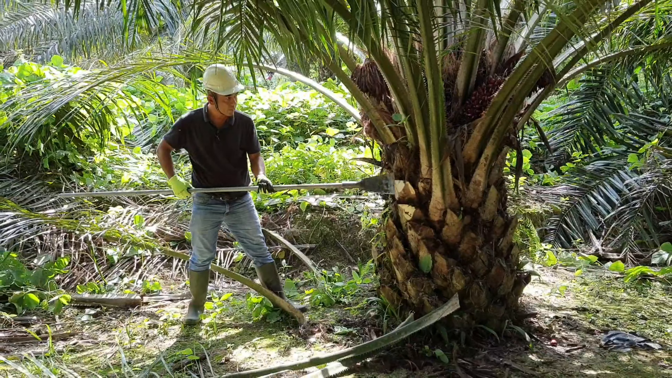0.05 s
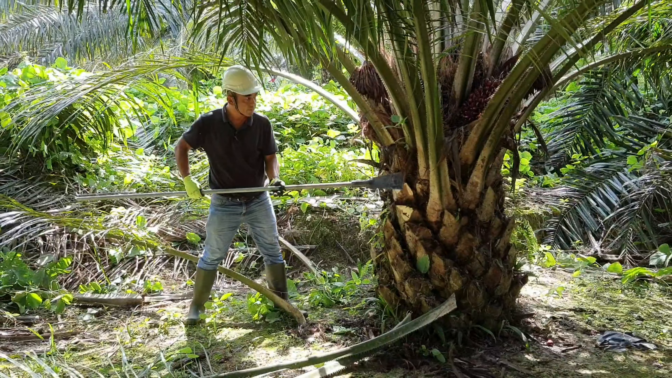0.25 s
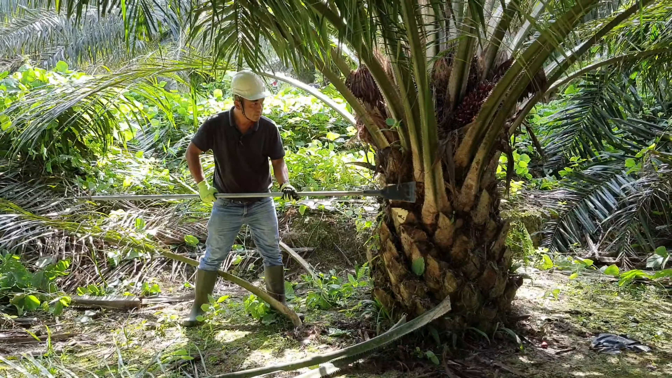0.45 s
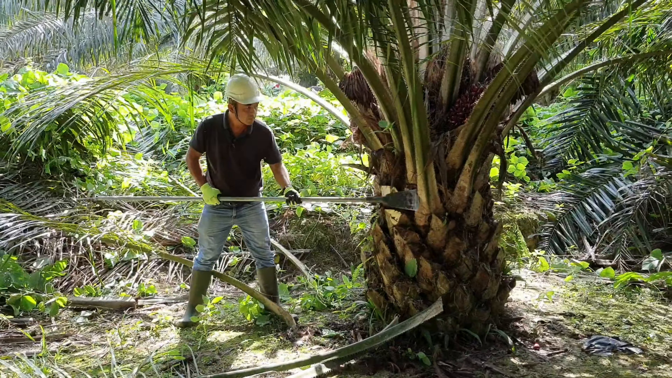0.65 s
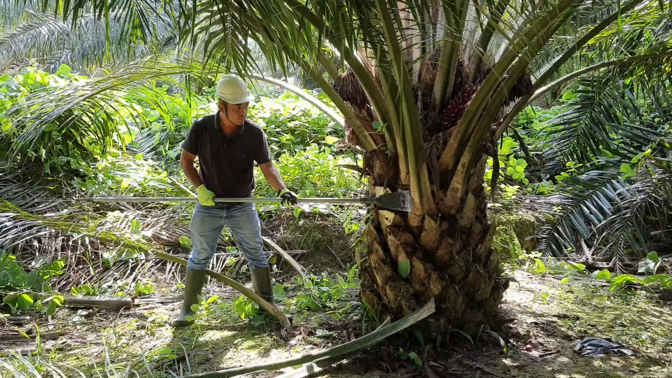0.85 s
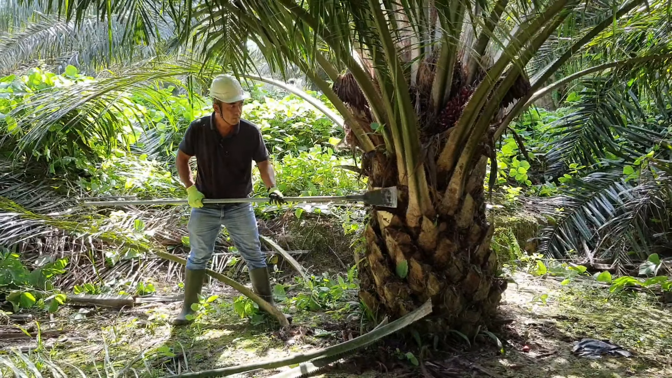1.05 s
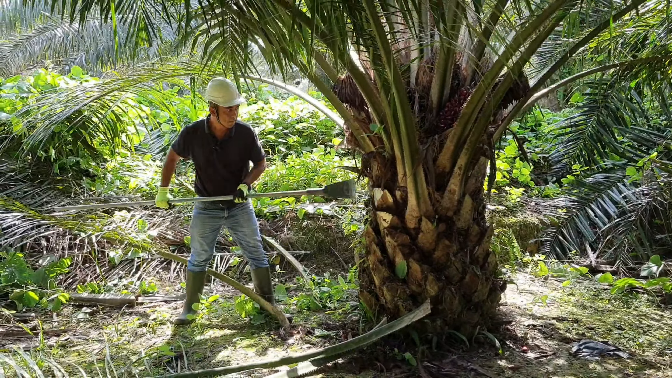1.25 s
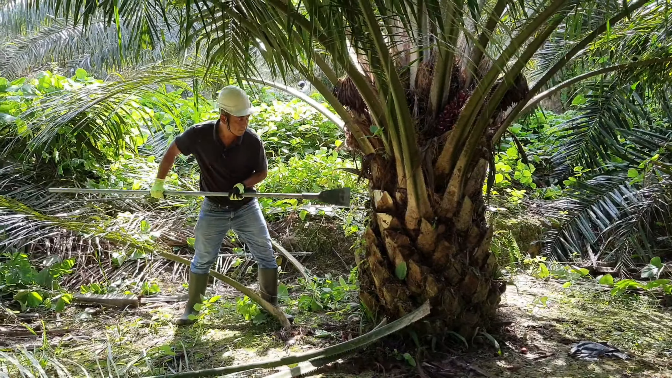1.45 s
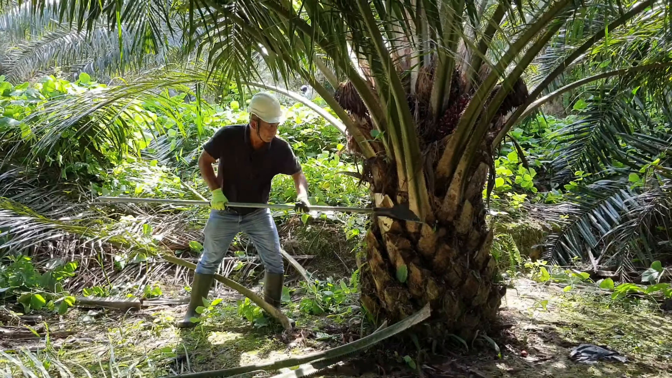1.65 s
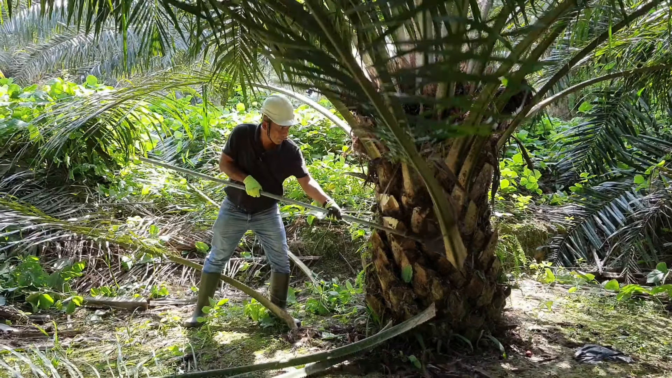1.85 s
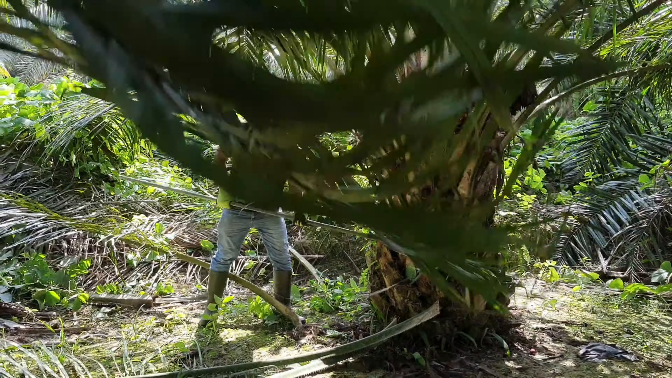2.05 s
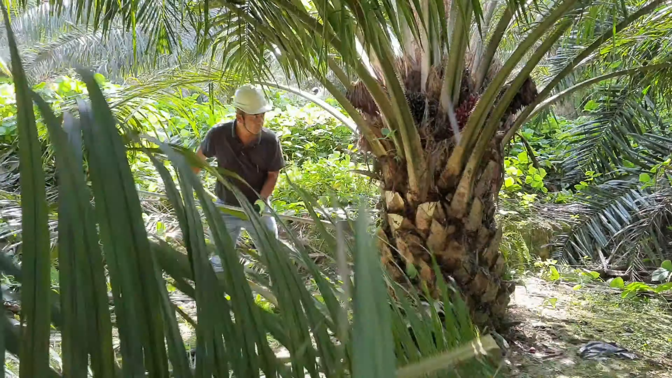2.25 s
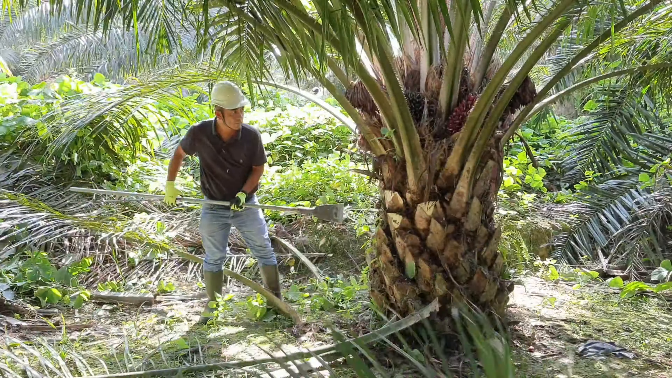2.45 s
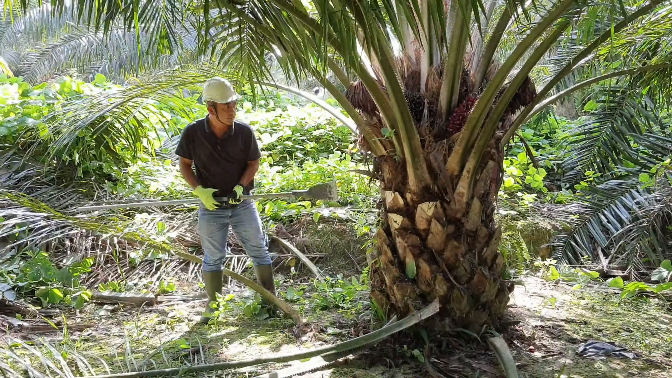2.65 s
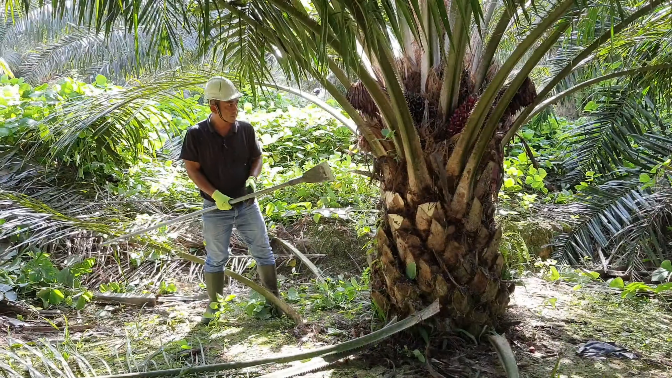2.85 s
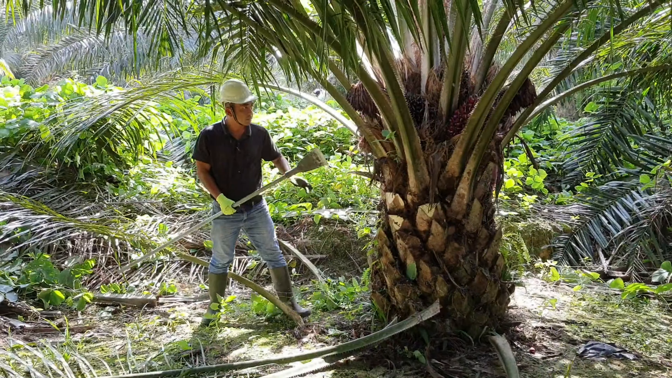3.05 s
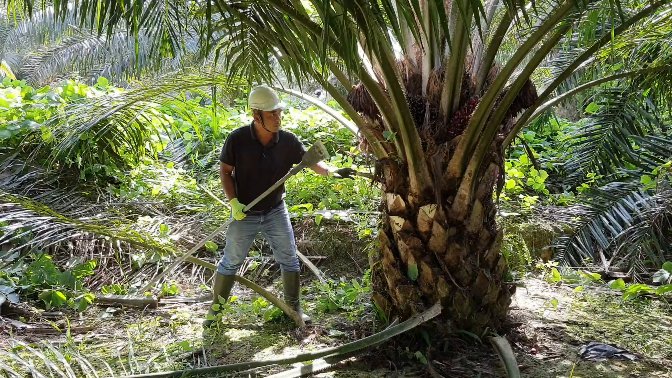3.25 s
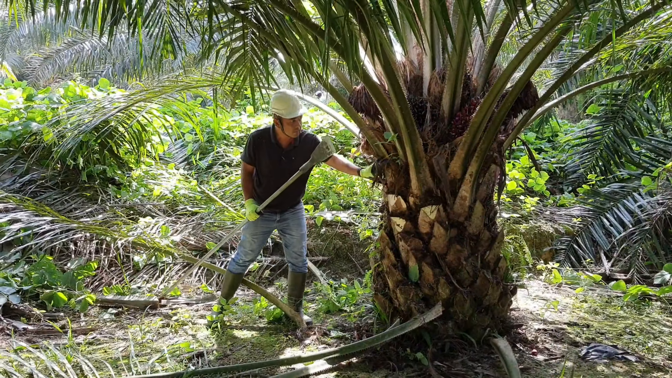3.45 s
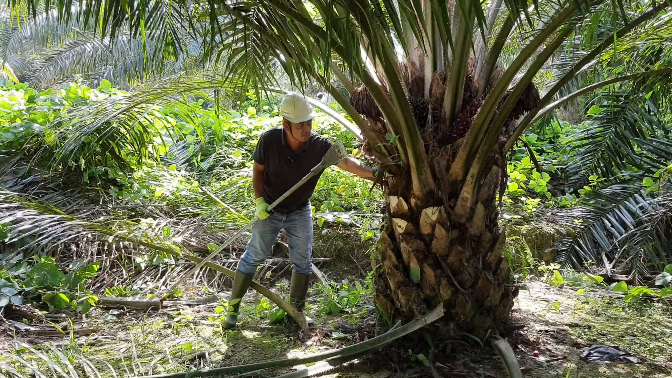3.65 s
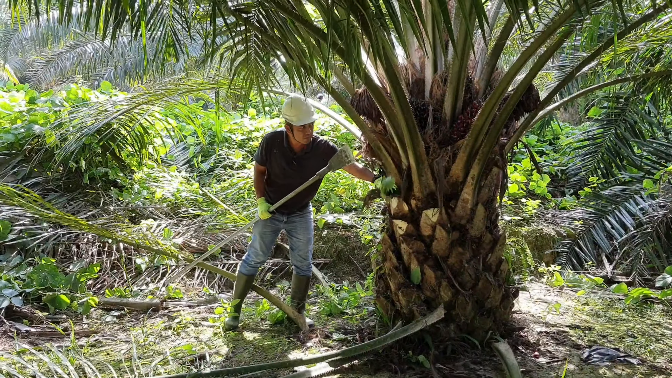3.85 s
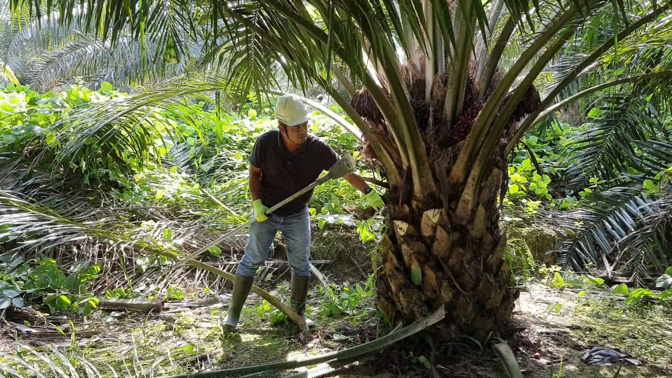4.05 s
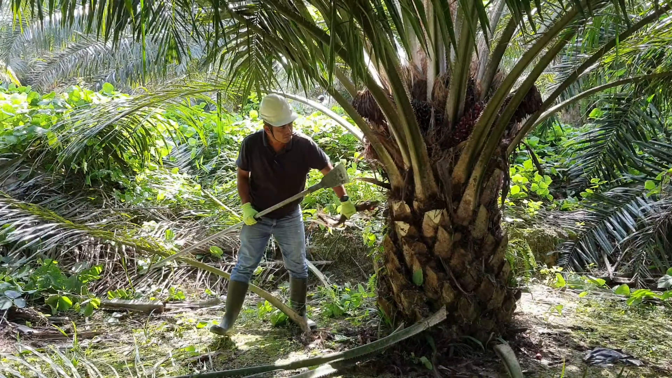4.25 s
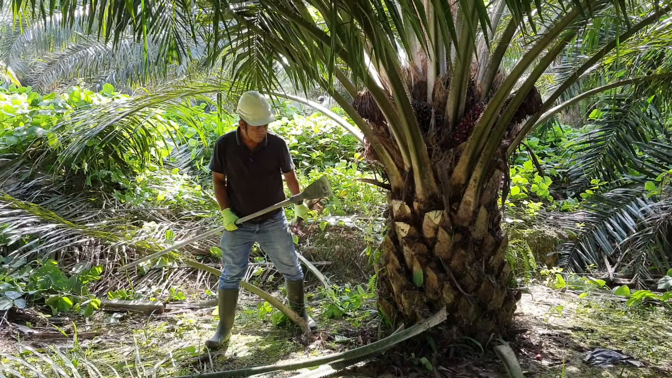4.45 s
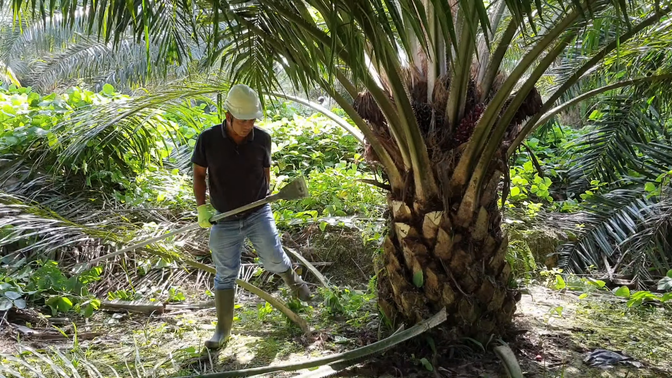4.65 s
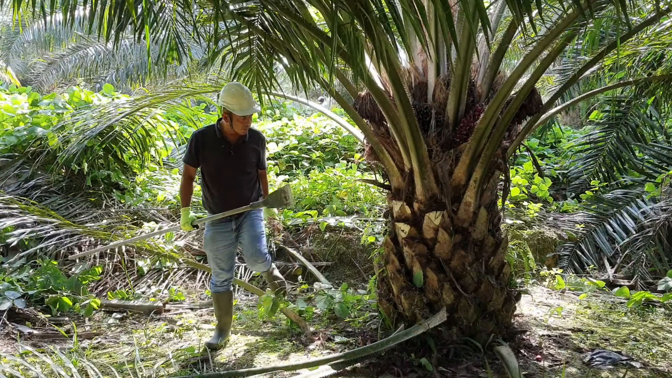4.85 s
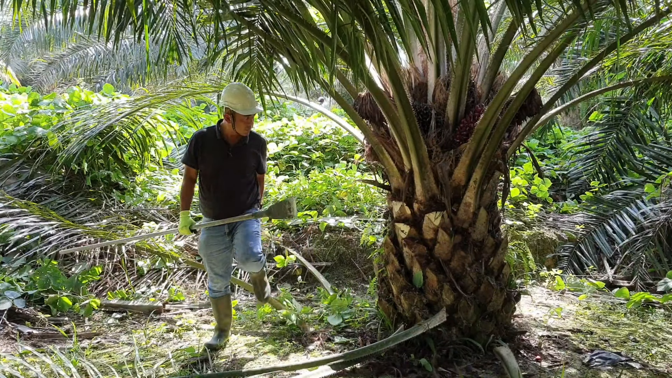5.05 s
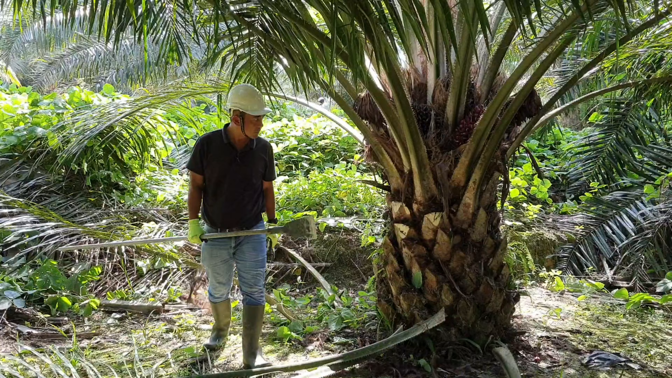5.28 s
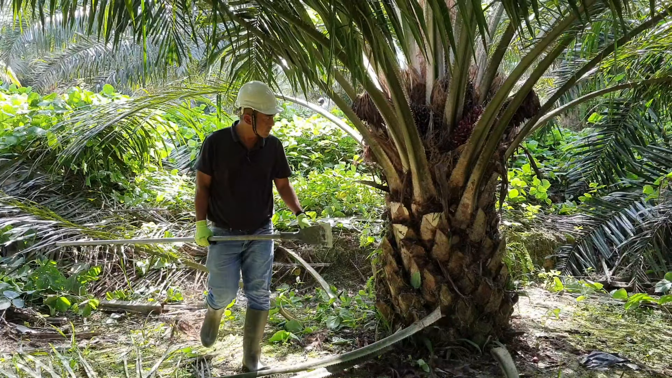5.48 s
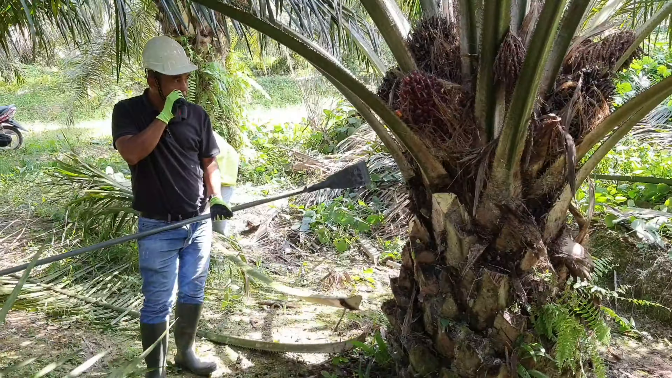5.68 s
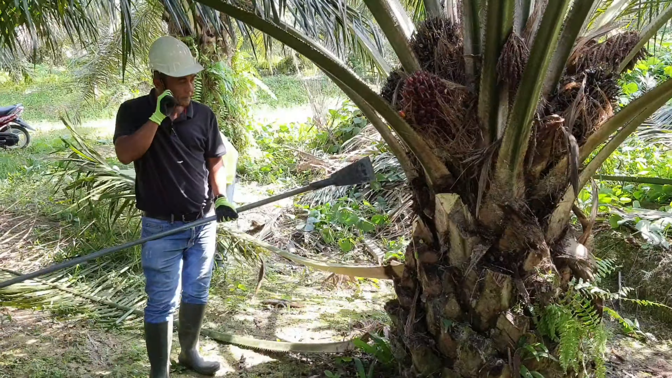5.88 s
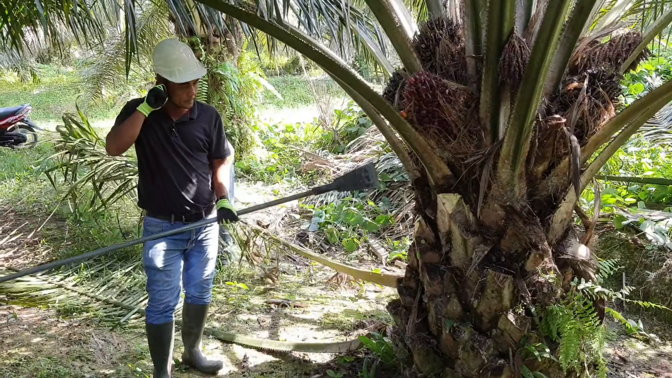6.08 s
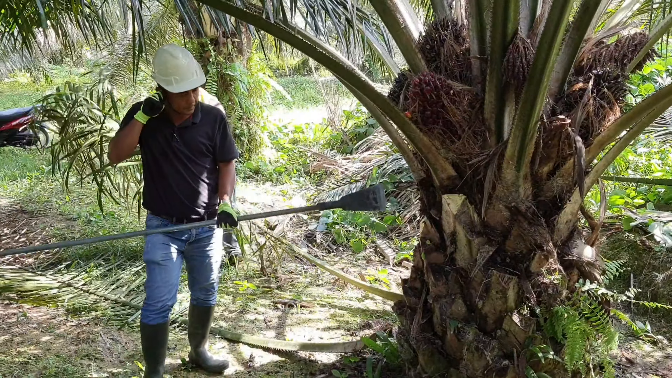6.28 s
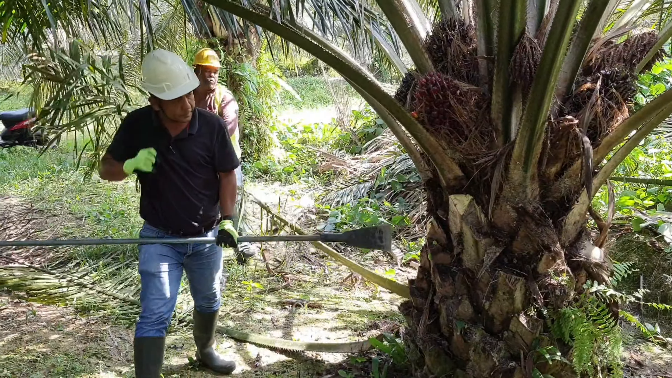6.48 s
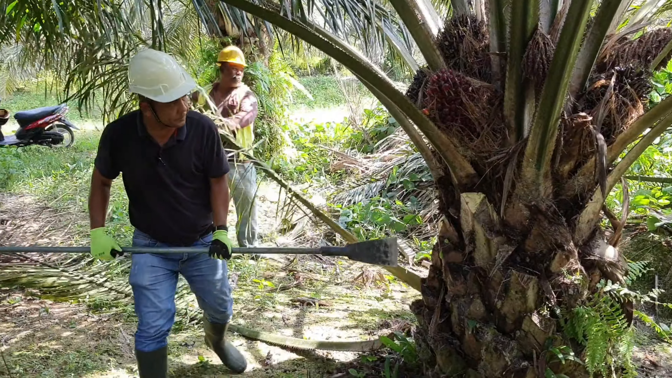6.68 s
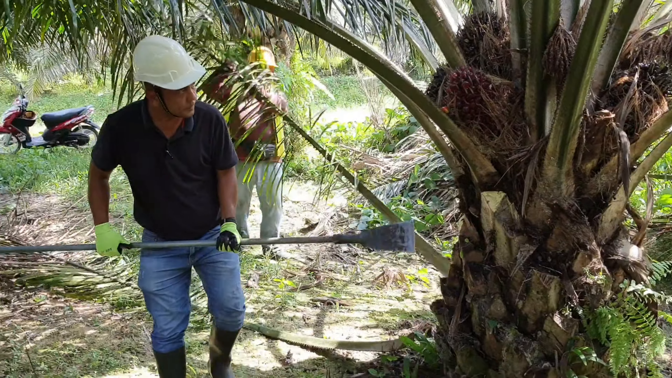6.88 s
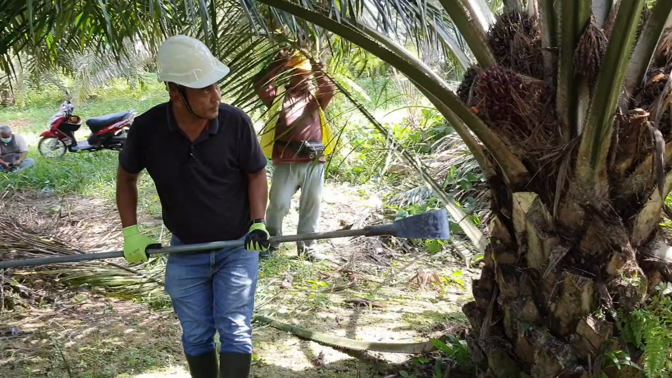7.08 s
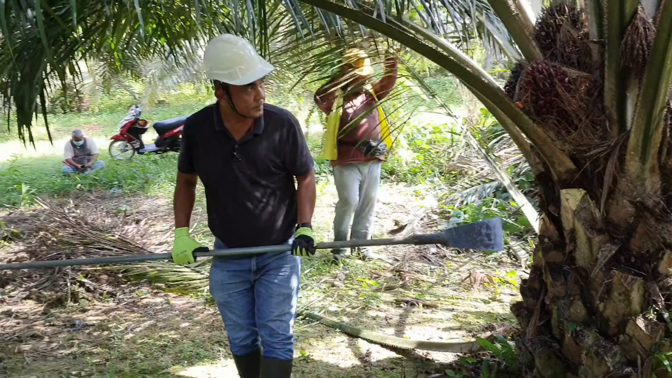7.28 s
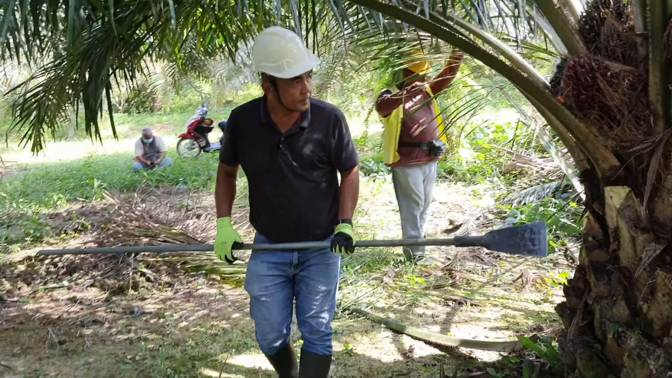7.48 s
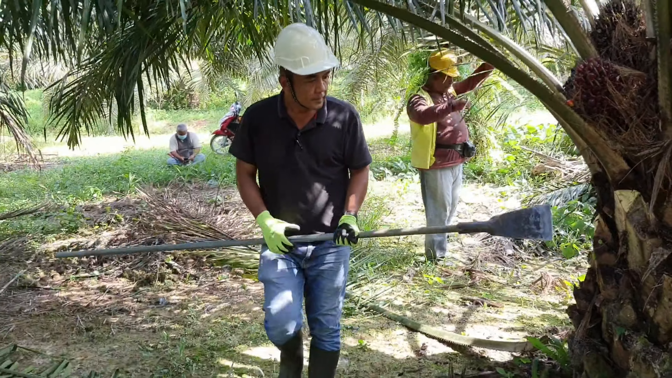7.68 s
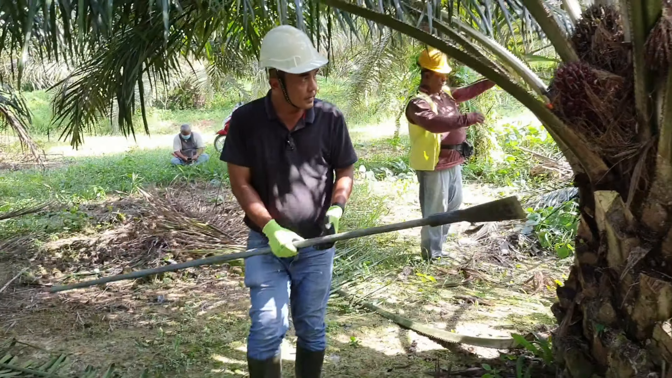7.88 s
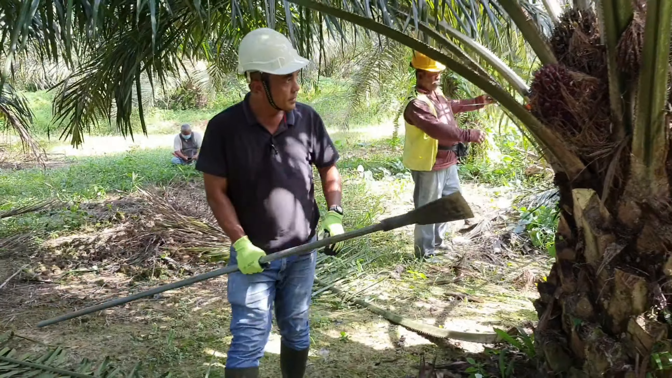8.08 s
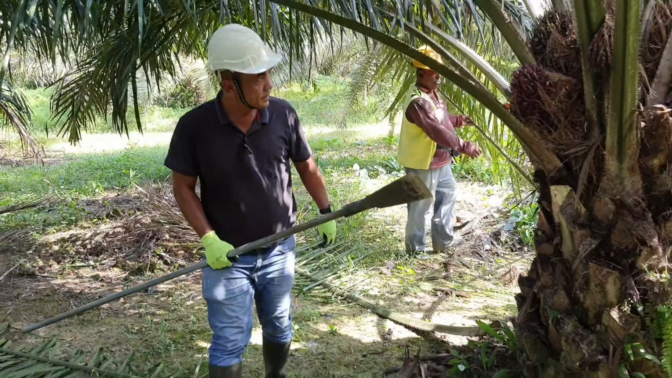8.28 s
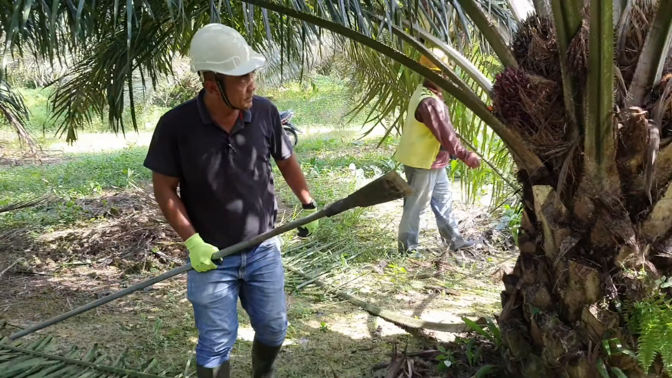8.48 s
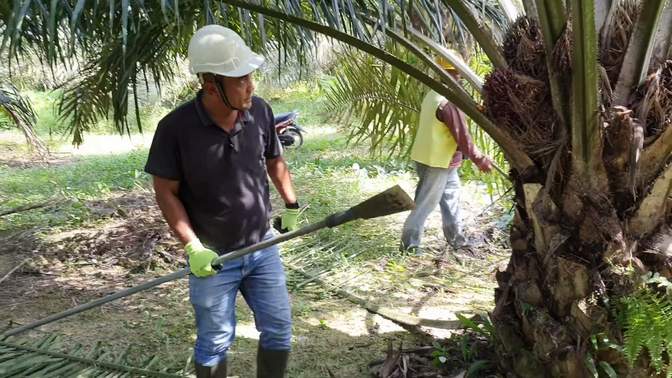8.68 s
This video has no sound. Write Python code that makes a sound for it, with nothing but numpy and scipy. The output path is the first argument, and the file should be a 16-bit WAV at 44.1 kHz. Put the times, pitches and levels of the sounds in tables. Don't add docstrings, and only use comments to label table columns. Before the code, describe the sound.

A long chisel pole splits a palm stalk with a creaking tear, the frond sweeps down and crashes on dry litter, then another is dragged and stacked.

```python
import sys
import numpy as np
from scipy import signal
from scipy.io import wavfile

SR = 44100
rng = np.random.default_rng(int(sys.argv[2]) if len(sys.argv) > 2 else 0)


def generate_wav(sig):
    pcm = np.round(np.clip(np.atleast_2d(sig).T, -1, 1) * 32767).astype(np.int16)
    wavfile.write(sys.argv[1], SR, pcm)


def convert_level_to_amplitude(level_db):
    exponent = np.asarray(level_db, float) / 20
    return 10 ** exponent


N = 384993

MOVE_S = 5.615
# (first [dB], second [dB])
CALM_DB = (-67, -63.5)
DRONE_DB = (-81.5, -66)
# (frequency [Hz], level [dB per Hz])
WIND_COLOUR = [(12, -49), (20, -21.5), (42, -1.5), (59, 10), (124, -0.5), (200, -16.5), (260, -36),
               (440, -120)]
# (peak time [s], peak level [dB], decay [dB/s])
GUSTS = [(0.07, -60.5, 13), (0.7, -61.5, 20), (1.25, -59, 40), (1.82, -45.5, 100), (2.09, -43.5, 23),
         (2.42, -46, 32), (4.22, -59, 30), (5.7, -56, 17), (6.08, -54.5, 13), (6.71, -64.5, 100),
         (7.2, -53.5, 200), (8.31, -42, 56), (8.42, -51, 50), (8.51, -50, 87)]
# (frequency [Hz], level [dB per Hz])
GROVE_COLOUR = [(88, -40), (150, -8), (689, -31), (2500, -29), (3700, -20.5), (4860, 0), (6260, -8.5),
                (7180, -7.5), (9820, -22.5), (14500, -10.5), (16000, -23.5)]
# (frequency [Hz], width [Hz], level [dB rms], throb [1/s], throb depth [0-1])
INSECTS = [(7100, 170, -68.5, 58, 0.4), (7420, 520, -71, 83, 0.5), (4800, 350, -78.5, 54, .2),
           (14430, 500, -83, 80, .3)]

# (time [s], length [s], level [dB rms], frequency [Hz], width [Hz])
SCUFFS = [(0.0, 0.31, -67, 350, 324), (0.491, 0.93, -71.5, 340, 131), (0.991, 0.13, -68.5, 1450, 900),
          (1.772, 0.058, -32, 310, 200), (1.8, 0.6, -50, 139, 80), (1.928, 0.1, -43, 1620, 160),
          (1.956, 0.61, -45, 248, 208), (2.563, 0.096, -30, 2600, 1500), (2.615, 0.091, -30, 4400, 2200),
          (3.505, 0.22, -70.5, 335, 120), (3.7, 0.1, -57, 298, 272), (3.847, 0.24, -59.5, 368, 140),
          (4.063, .035, -49, 3470, 6000), (4.283, 0.29, -59.5, 330, 180), (4.289, 0.29, -63.5, 1280, 400),
          (4.714, 0.27, -66, 807, 250), (5.472, .07, -68.5, 850, 300), (4.721, 0.55, -74.5, 335, 109.5),
          (4.839, 0.13, -44.5, 3630, 5000), (5.364, 0.15, -75, 497, 600), (6.805, 0.03, -76, 900, 900),
          (7.3, 0.019, -41, 2640, 463), (7.446, 0.086, -51, 357, 138.9), (6.705, 0.034, -54, 330, 500),
          (7.986, 0.063, -57, 332, 40), (8.488, .035, -52, 550, 120), (3.35, 0.27, -64, 3000, 2500),
          (0.357, .14, -73.5, 2920, 1500)]
# (frequency [Hz], level [dB], t60 [s])
POLE_TAPS = [
    (0.7238, -20),
]
POLE_MODES = [(393, -9, 0.049), (642, -12.5, 0.095), (1003, -16.5, 0.43), (1630, -9.5, 0.097),
              (3200, -32, 0.52), (4000, -18, 5.0), (4802, -15, 5.0), (5820, -10.5, 0.41), (8000, -19, 0.22)]
HAFT_TAPS = [
    (3.702, -31),
    (4.219, -46),
]
HAFT_MODES = [(824, -7, 0.12), (1620, -17, 0.21), (2040, -8, 0.19), (2280, -11, .1), (2460, -12, 0.083)]
BLADE_TAPS = [
    (7.528, -17),
]
BLADE_MODES = [(900, -7, 0.036), (1760, -20, .05), (2500, -4.5, 0.12), (3244, -2, 0.13), (3890, -1, 0.11),
               (4170, -4, 0.14), (4630, 0, 0.13), (5550, -0.5, 0.16), (6400, -13, .1), (7300, -14, 0.13),
               (8200, -18, .06), (9100, -20, .06)]
# (time [s], peak level [dB], frequency [Hz], t60 [s], left minus right [dB])
THUDS = [
    (2.35, -16.5, 125, 0.074, 21.5),
    (2.394, -18, 82.6, 0.064, -1.5),
    (3.962, -47, 321, 0.021, -1),
    (4.068, -38.5, 384, 0.058, -3),
    (5.385, -46, 219, .06, -5),
    (5.425, -40, 110, 0.089, -9),
    (6.043, -26, 373, 0.13, -5),
    (6.71, -34, 157, 0.081, -4),
    (7.175, -25, 280, 0.063, -2),
    (8.335, -22, 100, 0.08, -9),
]

# (frequency [Hz], level [dB per Hz])
LEAF_COLOUR = [(100, -31), (170, -9.5), (312, 2.5), (850, -0.5), (1180, -1.5), (1700, -4.5), (2480, -7.5),
               (5620, -3), (9950, -6.5), (12300, -4), (14800, -5)]
# (frequency [Hz], side minus mid [dB])
SPREAD = [(60, -21.5), (180, -12.5), (550, -4.5), (1650, -1), (4970, 0), (15000, 0)]
# (time [s], left minus right [dB])
LEAN = [
    (0.0, -5),
    (2.5, -1),
    (5.4, -3.5),
    (5.7, -0.8),
    (7.3, -2),
    (8.73, -2),
]
RUSTLE_EDGES_HZ = (300, 1350, 2300, 11000)
# (time [s], peak level [dB], t60 [s])
TICKS = [(0.0366, -21, 0.037), (0.1428, -26, 0.03), (2.0313, -10, 0.03), (2.0931, -12, 0.03),
         (2.1344, -9, 0.033), (2.4344, -6, 0.03), (2.45, -3.5, 0.03), (2.4674, -14, 0.03),
         (2.4943, -9.5, 0.03), (2.7432, -23, 0.03), (3.1312, -39, 0.03), (3.3827, -39, 0.03),
         (3.8861, -45, 0.03), (3.9665, -46, 0.03), (4.0342, -37, 0.03), (4.0597, -41, 0.03),
         (4.1066, -29, 0.03), (4.2188, -27, 0.03), (5.8825, -19, 0.03), (5.9369, -23, 0.03),
         (6.0102, -25, 0.03), (6.0394, -20, 0.03), (7.1501, -21, 0.03), (7.196, -17, 0.012),
         (7.2774, -18, 0.033), (7.3094, -17, 0.03), (7.3477, -19, 0.015), (7.362, -14, 0.02),
         (7.5716, -23, 0.03), (7.646, -37, 0.03), (8.0142, -34, 0.03), (8.078, -26, 0.03),
         (8.2894, -35, 0.03), (8.5051, -17, 0.03), (8.525, -19, 0.03)]
# (time [s], peak level [dB], centre [Hz])
TWIGS = [(0.0999, -42, 6990), (0.1295, -39, 4360), (0.2614, -44, 7000), (0.287, -42, 3240),
         (0.3624, -49, 6830), (1.802, -13, 3420), (1.848, -18, 2240), (1.8854, -16, 5090),
         (2.1344, -17, 5630), (2.3514, -16, 6580), (2.5415, -18, 2530), (2.5744, -14.5, 2420),
         (2.5948, -14, 2650), (2.6124, -15, 6270), (2.6334, -16, 2760), (2.653, -8, 4370),
         (2.673, -11, 4490), (2.699, -18, 5250), (2.8754, -30, 5410), (2.9204, -26, 6100),
         (3.1295, -28, 4300), (3.2365, -36.5, 1700), (3.3034, -36, 4360), (3.409, -38, 4640),
         (3.6834, -53, 4740), (3.7005, -43, 2020), (3.7994, -46, 5910), (3.8574, -36, 4440),
         (3.9662, -28, 4980), (4.0198, -39, 5150), (4.034, -38, 4950), (4.107, -42, 4630),
         (4.148, -31, 5070), (4.2201, -19.5, 5630), (5.624, -29, 6170), (5.7, -18, 4710),
         (5.8194, -24, 5720), (6.0594, -10, 4240), (6.2294, -23, 3900), (6.2614, -26, 4860),
         (6.3324, -26, 6900), (6.769, -33, 5540), (7.1746, -33, 4480), (7.197, -18, 5600),
         (7.409, -25, 5940), (7.4494, -27, 4040), (7.6454, -31, 4720), (8.0294, -29, 6800),
         (8.0774, -31, 4340), (8.362, -34, 1650), (8.5044, -25, 4320), (8.524, -23, 4420)]
# (time [s], peak level [dB], centre [Hz])
SNAPS = [(0.1286, -45, 4360), (0.2388, -51, 6100), (0.299, -40.5, 2500), (0.4, -49, 4360),
         (0.874, -42, 4730), (1.086, -49.5, 1500), (1.405, -48, 2590), (1.579, -48.5, 3200),
         (3.6427, -35.5, 2220), (3.8307, -31.5, 5100), (3.8877, -30.5, 2780), (3.9668, -26.5, 4760),
         (4.035, -32.5, 5380), (4.108, -28, 4630), (4.148, -24, 4750), (4.199, -48, 3000),
         (4.212, -29, 3650), (4.2196, -24, 1880), (4.4847, -42, 1266), (5.9414, -23, 3500),
         (6.039, -20, 3730), (7.176, -32, 3940), (7.196, -23.5, 4630), (7.2782, -29.5, 6300),
         (7.3477, -36, 4860), (7.362, -33, 5000), (7.5274, -29, 4640), (7.716, -30, 4920),
         (8.3707, -35, 1330), (8.4192, -29, 4800)]
# (time [s], peak level [dB], centre [Hz])
BREAKS = [(1.768, -20, 2140), (2.039, -16.5, 4700), (2.394, -16, 5500), (2.437, -18, 4500),
          (2.452, -18, 7100), (2.47, -18, 6150), (2.532, -19, 4080), (2.6098, -15, 2870),
          (2.654, -19, 4870), (2.6779, -13, 1460), (2.743, -13, 4460), (2.82, -21, 4950),
          (2.9972, -27, 4190), (3.0729, -36, 4250), (3.191, -36, 1670)]
# (time [s], peak level [dB], centre [Hz], crisp top against body [dB])
CRUNCHES = [(0.0363, -27.5, 4900, 28), (0.1435, -31.5, 4320, 2), (0.2009, -30, 5700, -7),
            (0.7236, -28, 2500, -13), (1.697, -33, 3800, -12), (3.1305, -33, 4330, -17),
            (3.228, -35, 5700, -18), (3.701, -43.5, 2500, -29), (4.0582, -30, 4970, -18),
            (4.2213, -26.5, 4460, -15), (5.452, -37.5, 4720, 7), (6.7693, -38, 2080, -25),
            (8.0132, -32, 5550, 3)]
# (time [s], crush level [dB])
CUT = [
    (1.762, -55),
    (1.764, -25),
    (1.783, -24.5),
    (1.788, -13.5),
    (1.794, -12.5),
    (1.8, -15),
    (1.81, -16.5),
    (1.816, -35.5),
    (1.84, -49.5),
]
# (frequency [Hz], width [Hz], level [dB])
STALK = [(660, 160, -3.5), (800, 42, 3.5), (1192, 56, -3.5), (1400, 44, -1), (2140, 90, 0.5),
         (2420, 28, -11.5), (2640, 74, -25.5), (3420, 210, -9), (4500, 340, -9)]
# (time [s], peak level [dB], frequency [Hz])
CREAKS = [(0.035, -47, 660), (0.1, -51, 1290), (0.498, -59, 730), (1.18, -55, 1400), (1.35, -60, 556),
          (1.405, -63, 1050), (1.576, -63, 1450), (0.129, -52, 1300), (0.129, -45, 2600),
          (0.186, -43, 2800), (0.216, -56, 1400), (0.299, -48, 1500), (0.299, -47, 3200),
          (0.363, -54, 1500), (0.4, -46, 3020), (0.202, -39, 2760), (0.314, -44, 1350), (0.717, -42, 860),
          (0.994, -50, 1370), (1.697, -44, 2210), (1.765, -19, 800), (1.808, -13.5, 647), (1.822, -22, 690),
          (1.832, -20, 730), (1.846, -17.5, 713), (1.855, -19.5, 760), (1.884, -23, 643), (1.899, -22, 724),
          (1.935, -20, 794), (1.945, -20.5, 704), (1.966, -29, 800), (2.018, -32.5, 830), (2.041, -35, 800),
          (3.642, -48, 2300), (3.966, -43, 2250), (4.11, -41, 760), (4.238, -40, 2300), (4.22, -34.5, 660),
          (4.222, -32, 1130), (5.9422, -23, 2500), (5.7, -30, 2200), (6.0, -30, 2200), (6.045, -25, 2100),
          (6.066, -24, 2300), (8.38, -36, 1500)]

# (time [s], force [dB], stiffness [dB]: plus = woody ribs, minus = thin tips)
AIMING = [
    (0.0, -61.5, 3),
    (0.5, -77.5, 6),
    (0.87, -65, 0),
    (1.53, -77, 6),
    (1.758, -59, -2),
]
FALL = [
    (1.771, -24, 0),
    (1.86, -26.5, 3),
    (1.925, -28.5, 5),
    (2.0, -29.5, -1.5),
    (2.084, -30, -0.5),
    (2.1, -26.5, 1.5),
    (2.16, -27, 0),
    (2.25, -28.5, -1.5),
]
CRASH = [
    (2.34, -26.5, -2),
    (2.41, -26, -0.5),
    (2.467, -29, -5),
    (2.495, -32, 1),
    (2.56, -28.5, 4),
    (2.61, -27.5, 2.5),
    (2.7, -29.5, -0.5),
    (2.8, -33.5, 3),
    (3.2, -52.5, 3),
]
GROPING = [
    (3.45, -60, -0.5),
    (4.02, -51, 4),
    (4.41, -58.5, 8.5),
]
STEPS = [
    (4.496, -56.5, 0),
    (4.596, -62.5, -1),
    (4.7, -56.5, -3),
    (4.74, -50.5, 1.5),
    (4.82, -52.5, -5),
    (4.88, -49, -10),
    (4.96, -50, -8),
    (4.99, -53.5, -5.5),
    (5.318, -64, -4.5),
]
TURN = [
    (5.44, -59, -3),
    (5.47, -51.5, 1),
    (5.53, -54, -4),
    (5.608, -64, 2),
]
DRAG = [
    (5.62, -33.5, -3),
    (5.75, -34, -1.5),
    (5.925, -35, 1.5),
    (5.945, -32, -1.5),
    (6.01, -30, 1.5),
    (6.071, -24.5, -2.5),
    (6.107, -31.5, -1),
    (6.27, -34, -1),
    (6.3, -37.5, -2.5),
]
LIFT = [
    (6.45, -42, -2),
    (6.705, -49, -2),
    (6.95, -45, -4.5),
    (7.15, -42, -3.5),
    (7.26, -41, -6.5),
    (7.3, -40.5, -10.5),
    (7.4, -41, 0),
    (7.5, -42, 1),
]
STACKING = [
    (7.6, -44, 1),
    (7.93, -51, 2.4),
    (8.005, -47, 1.8),
    (8.03, -42.5, -0.97),
    (8.14, -45, -1.3),
    (8.2, -42, -0.17),
    (8.25, -45, -1),
]
TOSS = [
    (8.3, -44, 0),
    (8.45, -44.5, 3),
    (8.52, -40, -1),
    (8.58, -47, 4),
    (8.73, -57, 8),
]


def rms_one(x):
    return x / np.sqrt(np.mean(x ** 2) + 1e-20)


def in_time(rows):
    s, *columns = np.transpose(rows)
    return [np.interp(np.arange(N) / SR, s, c) for c in columns]


def at_hz(points, hz):
    point_hz, point_db = np.transpose(points)
    return np.interp(np.log(hz), np.log(point_hz), point_db)


def drift(rate):
    r = np.exp(-80 * np.pi * rate / SR)
    slow = signal.lfilter([1], [1, -2 * r, r * r], rng.standard_normal(N // 40 + 2002))[2000:]
    return np.interp(np.arange(N) / 40, np.arange(len(slow)), rms_one(slow))


def resonate(x, hz, width_hz):
    r = np.exp(-np.pi * width_hz / SR)
    zeros = np.array([1, 0, -1]) * (1 - r * r) / 2
    return signal.lfilter(zeros, [1, -2 * r * np.cos(2 * np.pi * hz / SR), r * r], x)


def add(out, s, sound, pan_db):
    i = max(int(s * SR), 0)
    sound = np.atleast_2d(sound)[:, :N - i] * convert_level_to_amplitude(np.array([[pan_db], [-pan_db]]) / 2)
    out[:, i:i + sound.shape[1]] += sound


def leaf_pan(s):
    return np.interp(s, *np.transpose(LEAN))


def bank(pair, low_hz, high_hz, level_db, patchy_db, flicker):
    mid_sum, side_sum = 0, 0
    bands = int(np.ceil(2.2 * np.log2(high_hz / low_hz)))
    edges = np.geomspace(low_hz, high_hz, bands + 1)
    for k, (low, high) in enumerate(zip(edges, edges[1:])):
        band = signal.butter(2, [low, high], "band", fs=SR, output="sos")
        mid, side = signal.sosfilt(band, pair[k % 2])
        hz = np.sqrt(low * high)
        coarse = convert_level_to_amplitude((level_db(hz) + patchy_db * drift(flicker))[::16])
        gain = np.interp(np.arange(N) / 16, np.arange(len(coarse)), coarse)
        mid_sum = mid_sum + gain * mid
        side_sum = side_sum + gain * convert_level_to_amplitude(at_hz(SPREAD, hz)) * side
    return np.array([mid_sum + side_sum, mid_sum - side_sum])


def gusts():
    t = np.arange(N) / SR
    rise_db_per_s = 155.5
    puffs = [peak_db - np.maximum(rise_db_per_s * (s - t), fall * (t - s)) for s, peak_db, fall in GUSTS]
    return np.max(puffs + [np.where(t < MOVE_S, *CALM_DB)], axis=0)


def grove():
    white = rng.standard_normal((2, 2, N))
    hiss = bank(white, 110.0, 17000, lambda hz: at_hz(GROVE_COLOUR, hz), patchy_db=-3.5, flicker=5.0)
    hiss = convert_level_to_amplitude(-61.5) * rms_one(hiss)
    drone = rms_one(resonate(resonate(white[0, 0], 335, 60), 345, 90))
    drone_db = np.where(np.arange(N) < MOVE_S * SR, *DRONE_DB) + 2 * drift(2.7)
    air = white[::-1] * convert_level_to_amplitude([[0], [12]])
    puffs = bank(air, 35, 167, lambda hz: at_hz(WIND_COLOUR, hz), patchy_db=1.9, flicker=6.8)
    puffs = signal.sosfilt(signal.butter(4, [44, 165], "band", fs=SR, output="sos"), puffs)
    return hiss + convert_level_to_amplitude(drone_db) * drone + convert_level_to_amplitude(gusts() + 2.5) * rms_one(puffs)


def insects():
    out, t = 0, np.arange(N) / SR
    swell_db_per_s = 0.67
    for hz, width_hz, level_db, throb, depth in INSECTS:
        song = resonate(resonate(rng.standard_normal((2, N)), hz, width_hz), hz, 2.0 * width_hz)
        pulse = 1 + depth * np.sin(2 * np.pi * throb * t + 2.6 * drift(3.1))
        song_db = level_db + 6.5 + swell_db_per_s * t + 0.73 * drift(4.1)
        out = out + convert_level_to_amplitude(song_db) * pulse * rms_one(song)
    return out


def scuffs():
    out = np.zeros((2, N))
    for s, length, level_db, hz, width_hz in SCUFFS:
        u = np.linspace(0, 1, int(length * SR))
        grit = rng.standard_normal((2, len(u))) * convert_level_to_amplitude(4.1 * rng.standard_normal(len(u)))
        hollow = rms_one(resonate(resonate(grit + grit[0], hz, width_hz), hz, 0.87 * width_hz))
        stroke = np.minimum(u / 0.09, 1) * np.minimum((1 - u) / 0.27, 1)
        add(out, s, convert_level_to_amplitude(level_db) * hollow * stroke, -1.5)
    return out


def steel():
    out, t = np.zeros((2, N)), np.arange(12000) / SR
    tools = ((POLE_TAPS, POLE_MODES, .09), (BLADE_TAPS, BLADE_MODES, .15), (HAFT_TAPS, HAFT_MODES, .17))
    for taps, modes, longest_t60 in tools:
        for s, peak_db in taps:
            rings = 0
            for hz, db, t60 in modes:
                split = rng.uniform(0.0066, 0.019)
                start = rng.uniform(0, 2 * np.pi, (2, 2, 1))
                pair = np.sin(2 * np.pi * hz * t + start[0] / 3)
                pair = pair + 0.29 * np.sin(2 * np.pi * hz * (1 + split) * t + start[1])
                rings = rings + convert_level_to_amplitude(db - 60 * t / min(t60, longest_t60)) * pair
            add(out, s, convert_level_to_amplitude(peak_db - 11) * rings * np.minimum(t / 0.0016, 1), -1.2)
    return out


def thuds():
    out, t = np.zeros((2, N)), np.arange(8000) / SR
    noises = rng.standard_normal((len(THUDS), 2, len(t)))
    for (s, peak_db, hz, t60, pan_db), noise in zip(THUDS, noises):
        sag = 0.78 * t + 0.00435 * (1 - np.exp(-t / 0.0063))
        phase = 2 * np.pi * hz * sag + [[.8], [-.8]]
        push = np.sin(phase) + 0.39 * np.sin(0.63 * phase)
        puff = 3.8 * resonate(noise, 0.6 * hz, 1.0 * hz) * convert_level_to_amplitude(-60 * t / 0.074)
        landing = (convert_level_to_amplitude(-60 * t / t60) * push + puff) * np.minimum(t * 1000, 1)
        add(out, s, -convert_level_to_amplitude(peak_db - 4.0) * landing, 0.91 * pan_db)
    return out


def ticks():
    out, t = np.zeros((2, N)), np.arange(2000) / SR
    bright = signal.butter(4, 11100, "high", fs=SR, output="sos")
    rows = [(s, db, max(t60, .005), 0) for s, db, t60 in TICKS]
    rows += [(s, db - 2.5, 0.02, hz) for s, db, hz in TWIGS]
    noises = rng.standard_normal(size=(len(rows), 4, len(t)))
    for (s, peak_db, t60, hz), noise in zip(rows, noises):
        grit = (noise[0] + 1.4 * noise[1:3]) * convert_level_to_amplitude(5.7 * noise[3] - 60 * t / t60)
        grit[:, 0] += 5.0
        click = resonate(grit, hz, 0.44 * hz) if hz else signal.sosfilt(bright, grit)
        add(out, s, convert_level_to_amplitude(peak_db) * click / np.abs(click.mean(axis=0)).max(), leaf_pan(s))
    return out


def snaps():
    out, t = np.zeros((2, N)), np.arange(6000) / SR
    crisp = signal.butter(1, 5000, "high", fs=SR, output="sos")
    brief = [(*row, -24) for row in SNAPS + BREAKS]
    for events, t60, crack, trim_db in ((CRUNCHES, .21, .6, 3.0), (brief, .06, 1.6, 2.5)):
        shape = convert_level_to_amplitude(-60 * t / t60) + crack * convert_level_to_amplitude(-60 * t / 0.0023)
        shape = shape * np.minimum(t / 0.00029, 1)
        noises = rng.standard_normal(size=(len(events), 4, len(t)))
        for (s, peak_db, hz, top_db), noise in zip(events, noises):
            burst = (noise[0] + 1.54 * noise[1:3]) * convert_level_to_amplitude(3.8 * noise[3]) * shape
            burst[:, 6] += 7.8 * crack
            body = 0.98 * resonate(burst, hz, 0.36 * hz) + 0.54 * resonate(burst, 890, 880)
            crunch = body + convert_level_to_amplitude(top_db + 12) * signal.sosfilt(crisp, burst)
            peak = np.abs(crunch.mean(axis=0)).max()
            add(out, s, convert_level_to_amplitude(peak_db + trim_db) * crunch / peak, leaf_pan(s))
    return out


def chop():
    out = np.zeros((2, N))
    when, crush_db = np.transpose(CUT)
    t = np.arange(when[0], when[-1], 1 / SR)
    crush = rng.standard_normal(size=(3, len(t))) * convert_level_to_amplitude(2.5 * rng.exponential(1, len(t)))
    crush = crush[0] + 0.45 * crush[1:]
    wood = 0
    for k, (hz, width, db) in enumerate(STALK):
        wood = wood + (-1) ** k * convert_level_to_amplitude(db) * resonate(crush, hz, 2.34 * width)
    add(out, when[0], convert_level_to_amplitude(np.interp(t, when, crush_db)) * rms_one(wood), -.8)
    t = np.arange(1500) / SR
    cycles = 20.7
    for s, peak_db, hz in CREAKS:
        knock = convert_level_to_amplitude(peak_db + 2.0 - 60 * t * hz / cycles) * np.sin(2 * np.pi * hz * t)
        add(out, s, knock * np.minimum(t * hz / 1.3, 1), -.8)
    return out


def rustle():
    contacts = rng.standard_normal((2, 2, N)) * convert_level_to_amplitude(2.38 * np.minimum(rng.exponential(1, N), 6))
    slipping = rng.random(N) < 40.0 * convert_level_to_amplitude(4.0 * drift(4)) / SR
    slips = slipping * np.minimum(rng.exponential(1, N), 3)
    fade = convert_level_to_amplitude(-60 / (.025 * SR))
    shake = 1 + 0.075 * signal.lfilter([1], [1, -fade], slips + 1e-18)
    shake = shake * convert_level_to_amplitude(0.65 * drift(3.1))
    gestures = AIMING + FALL + CRASH + GROPING + STEPS + TURN + DRAG + LIFT + STACKING + TOSS
    force_db, stiff_db = in_time(gestures)
    body_db = force_db - 1 + stiff_db
    blade_db = in_time(CUT)[0] - 5.5
    near_cut = np.abs(np.arange(N) / SR - CUT[3][0]) < .05
    struck = (blade_db > force_db) & near_cut
    force_db = np.where(struck, blade_db, force_db)
    stiff_db = np.where(struck, 14, stiff_db)
    levels = [body_db, force_db + stiff_db, force_db + 10.5, force_db + 6.5 - 0.24 * stiff_db]

    def level_db(hz):
        shares = [np.interp(np.log(hz), np.log(RUSTLE_EDGES_HZ), one) for one in np.eye(4)]
        return at_hz(LEAF_COLOUR, hz) + sum(share * db for share, db in zip(shares, levels) if share > 0)

    leaves = bank(rms_one(contacts * shake), 164.6, 17800, level_db, patchy_db=1.5, flicker=30)
    return leaves * convert_level_to_amplitude(in_time(LEAN)[0] / 2 * [[1], [-1]])


def scene():
    crisp = ticks()
    hard = snaps() + chop() + thuds() + steel()
    dull = signal.lfilter([.5], [1, -.5], hard[::-1])
    for s, echo_db in ((.011, -20), (.023, -21), (.041, -19.5)):
        add(hard, s, convert_level_to_amplitude(echo_db) * dull, 0)
    return hard + crisp + scuffs() + rustle() + insects() + grove()


def top_cut(x):
    return signal.sosfilt(signal.butter(12, 16500, fs=SR, output="sos"), x)


def record(dry):
    ports = signal.sosfilt(signal.butter(4, 44, "high", fs=SR, output="sos"), dry)
    rounded = 1.4 * np.tanh(ports / 1.4)
    mix = signal.sosfilt(signal.ellip(9, .5, 62, 15470, fs=SR, output="sos"), rounded)
    return top_cut(mix)


dry = scene()
out = record(dry)
generate_wav(out)
```